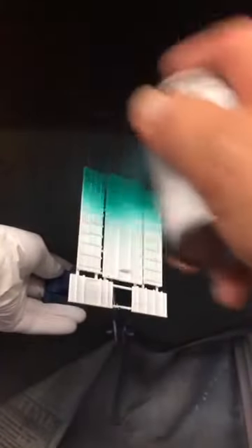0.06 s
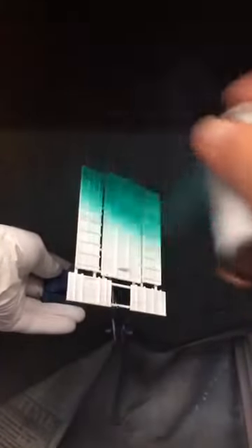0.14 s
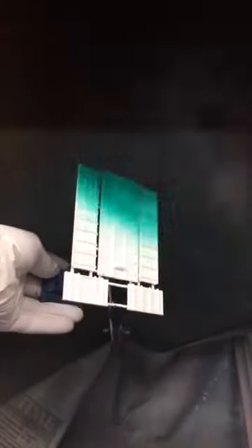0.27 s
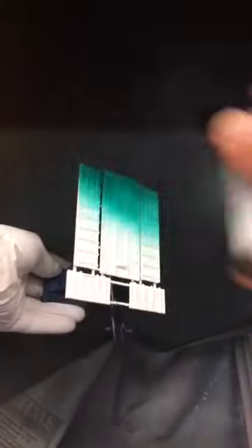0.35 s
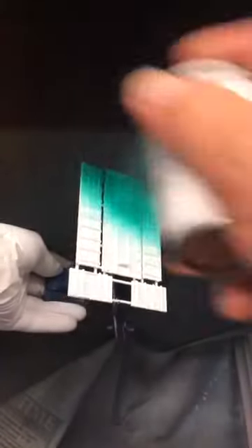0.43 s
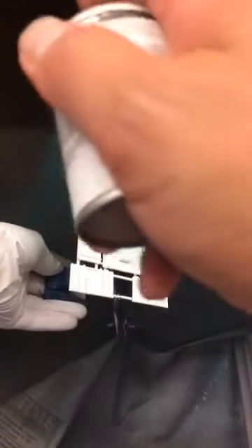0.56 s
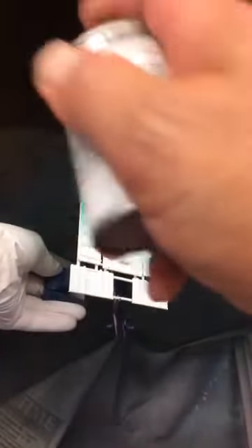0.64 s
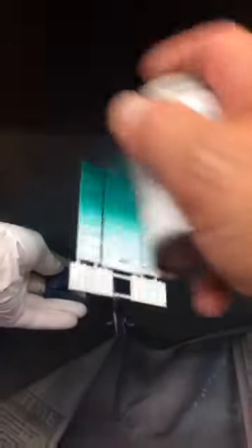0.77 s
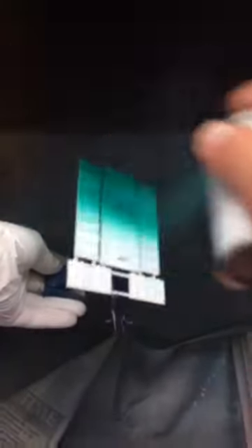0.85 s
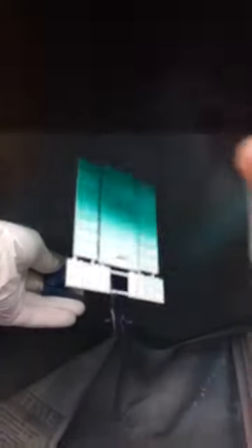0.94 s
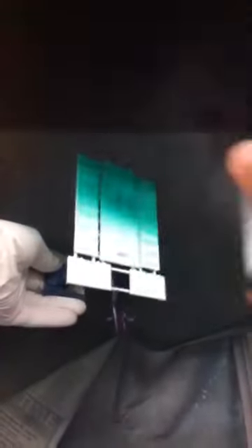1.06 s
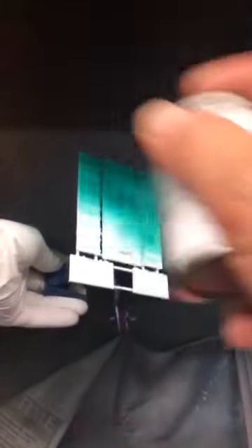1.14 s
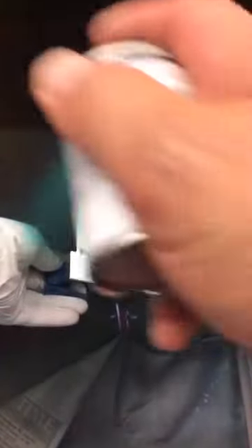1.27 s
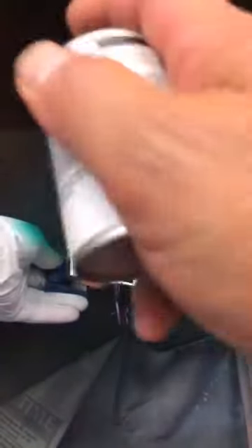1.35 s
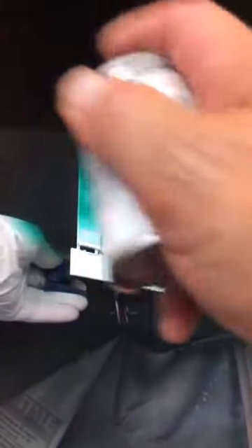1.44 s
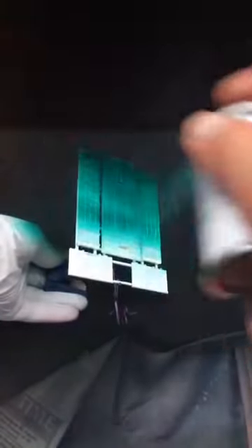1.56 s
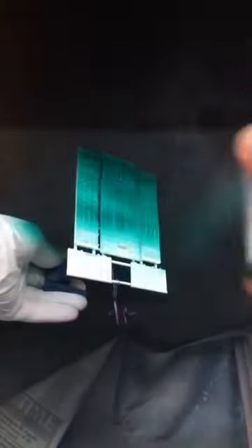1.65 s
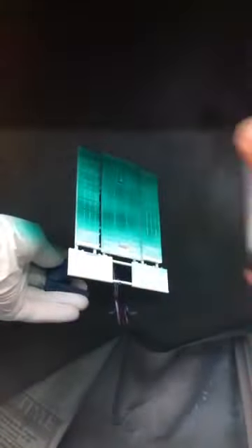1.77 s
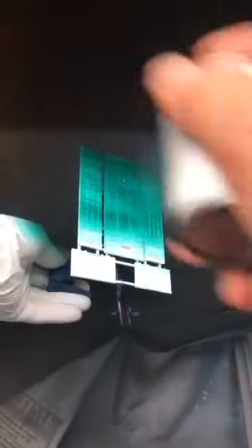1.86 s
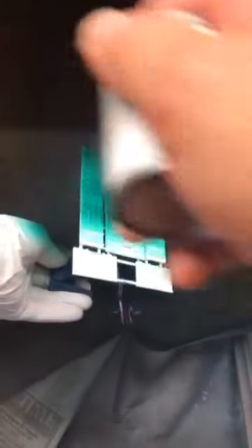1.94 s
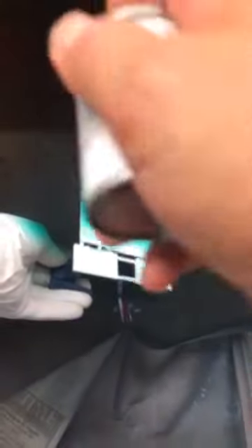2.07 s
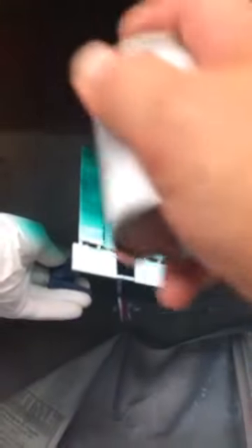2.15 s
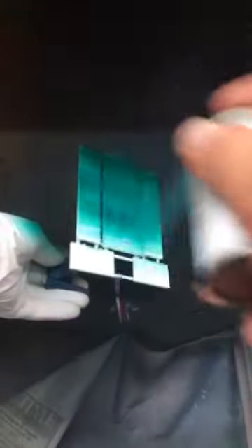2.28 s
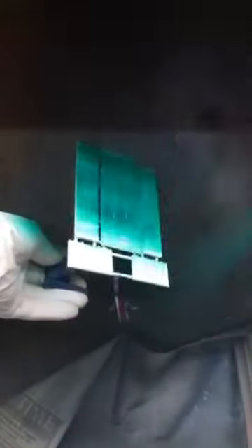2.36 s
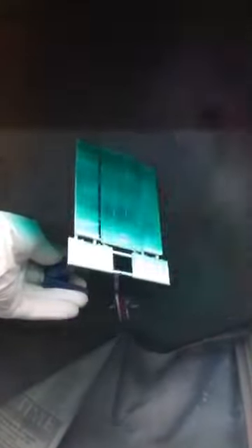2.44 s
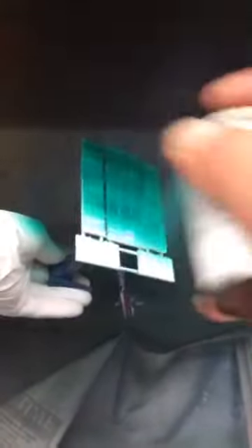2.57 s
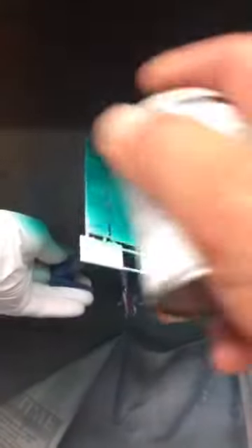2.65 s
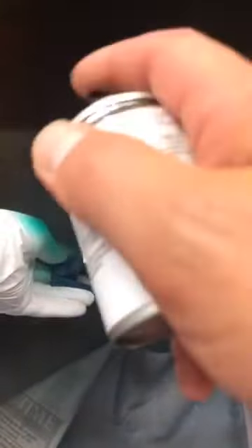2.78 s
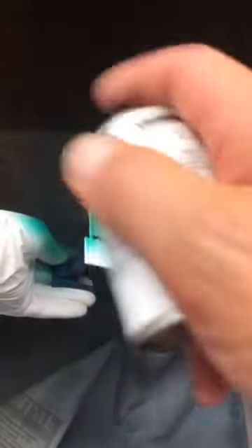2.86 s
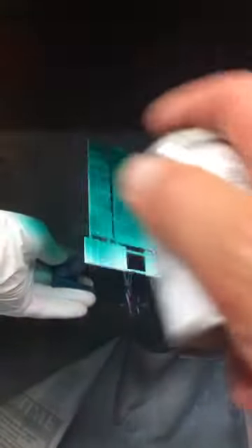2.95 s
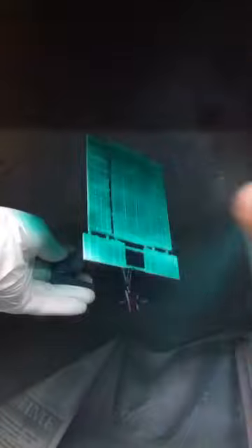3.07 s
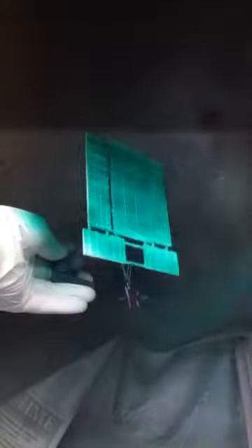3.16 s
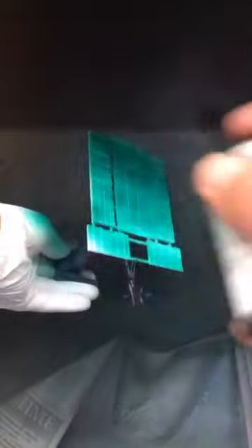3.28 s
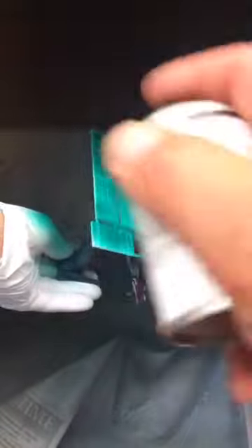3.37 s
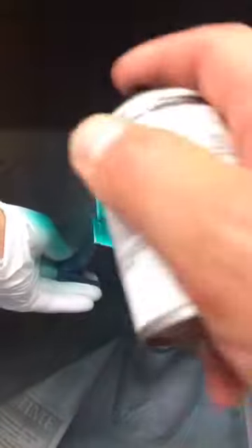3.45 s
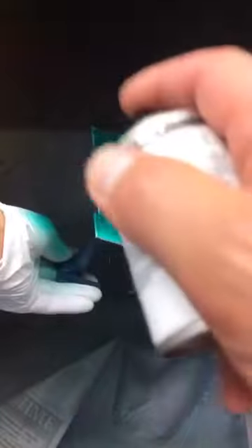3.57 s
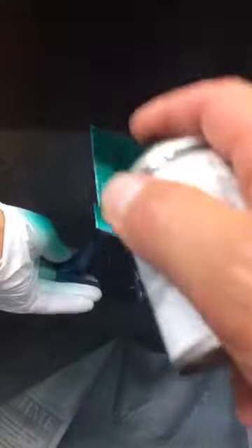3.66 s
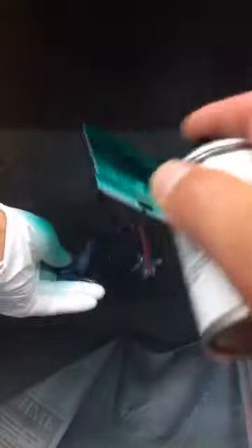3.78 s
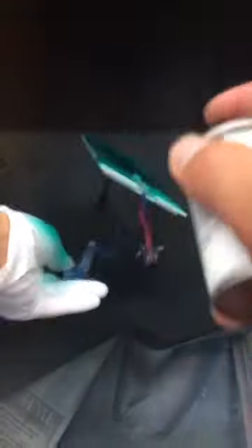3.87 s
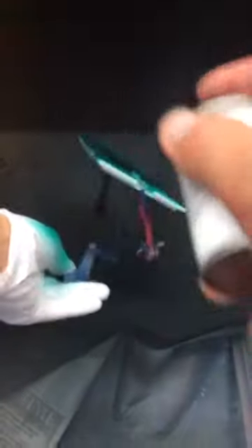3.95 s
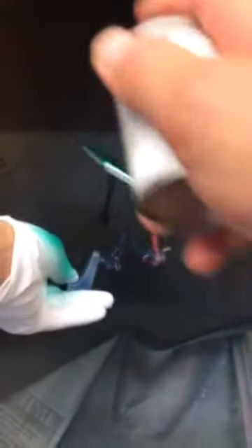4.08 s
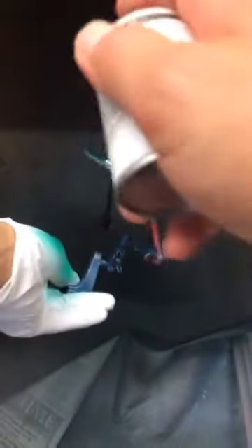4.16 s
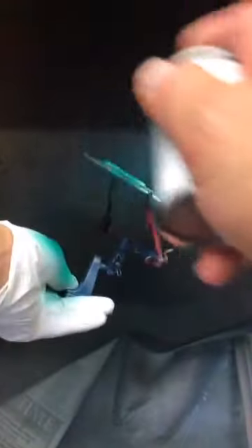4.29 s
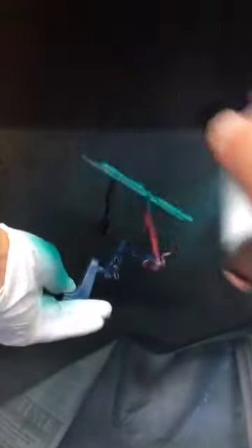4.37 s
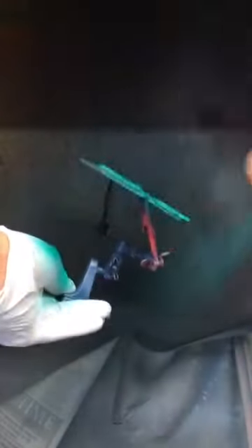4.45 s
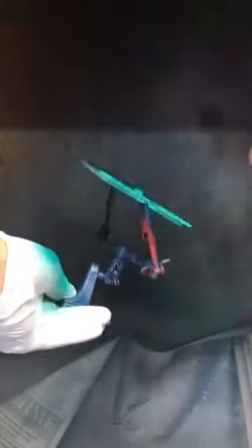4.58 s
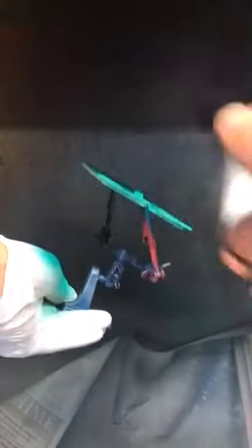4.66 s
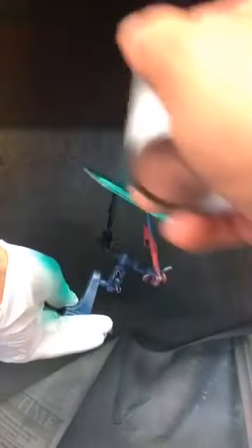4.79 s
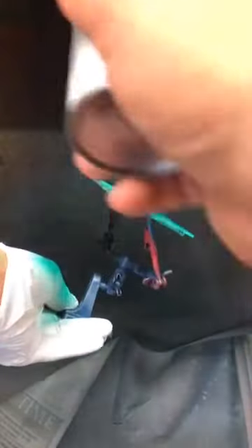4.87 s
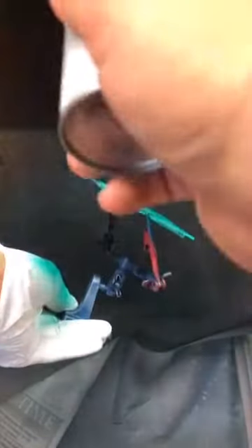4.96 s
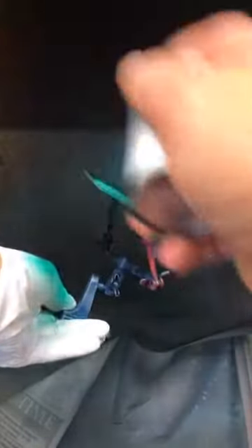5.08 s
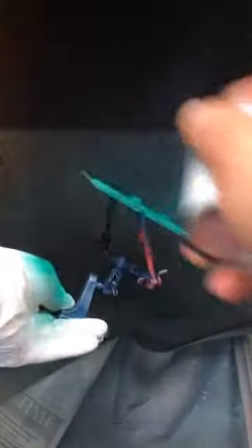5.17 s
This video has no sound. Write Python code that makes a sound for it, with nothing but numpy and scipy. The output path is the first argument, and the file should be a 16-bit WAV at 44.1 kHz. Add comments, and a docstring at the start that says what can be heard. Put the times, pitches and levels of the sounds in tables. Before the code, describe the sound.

An aerosol paint can sprays a small hand-held part in ten quick, even bursts, each a bright hiss with a soft low thump of air. In a brief pause a glove rubs faintly and the holder ticks as the part is turned. Then a few more bursts follow. The sound is close, in a small booth with a short reverberation and a quiet fan humming underneath.

```python
"""Spray can in a booth

A spray can sweeps in short bursts across a small hand-held part, heard close up. The nozzle hisses,
the jet rushes and thumps on the part, and the booth walls colour and briefly prolong it.
Underneath, a fan hums and a faint hollow ring wavers as the can is swung.
In one pause a glove rubs and the holder ticks as the part is turned."""
import sys
import numpy as np
from scipy import signal
from scipy.fft import rfft, irfft, next_fast_len
from scipy.io import wavfile
from scipy.ndimage import uniform_filter1d, map_coordinates

SR = 44100
rng = np.random.default_rng(int(sys.argv[2]) if len(sys.argv) > 2 else 0)


def to_wav(sig):
    """Store sig (one row per channel, or 1-D mono) as 16-bit WAV at the path in sys.argv[1].

    Samples outside -1..1 are clipped; the rate is SR.
    """
    pcm = np.clip(np.atleast_2d(sig), -1, 1) * 32767
    pcm = np.round(pcm).astype(np.int16)
    wavfile.write(sys.argv[1], SR, pcm.T)  # frames by channels


N = 230378
TIME = np.arange(N) / SR


def amp(db):
    """Decibels to gain."""
    return 10 ** (np.asarray(db) / 20)


def unit(x):
    """Scale to rms 1."""
    return x / np.sqrt(np.mean(x ** 2) + 1e-20)


def along(points, hz):
    """Read a curve of (frequency, value) points on a log frequency axis."""
    freqs, values = np.transpose(points)
    return np.interp(np.log(hz + 1), np.log(freqs + 1), values)


def step(t, width):
    """A smooth rise from 0 to 1 around t = 0."""
    return .5 + .5 * np.tanh(t / width)


def wobble(rate):
    """A smooth random curve with `rate` knots a second."""
    return map_coordinates(rng.standard_normal(int(N * rate / SR) + 4), [TIME * rate])


def filtered(x, response):
    """Equalise x with a gain given as a function of frequency."""
    size = next_fast_len(N + SR // 2)
    return irfft(rfft(x, size) * response(np.fft.rfftfreq(size, 1 / SR)), size)[..., :N]


def noise(spectrum, patchy_db=0):
    """Coloured noise of rms 1, optionally with drifting patches of random gain."""
    bins = signal.stft(rng.standard_normal(N), nperseg=512)[2]
    patches = uniform_filter1d(rng.standard_normal(bins.shape), size=6, axis=0)
    patches = unit(uniform_filter1d(patches, size=16, axis=1))
    white = signal.istft(bins * amp(patchy_db * patches), nperseg=512)[1][:N]
    return unit(filtered(white, lambda hz: amp(along(spectrum, hz))))


def fan(air_db=-69.5):
    """A bed of moving air with a few slightly unsteady motor tones."""
    # colour of the airflow: (frequency [Hz], relative level [dB])
    air_spectrum = [(20, -53), (40, -30), (62, -8), (90, -2.5), (135, 3.5), (200, -8), (300, 3.5),
                    (510, -7.5), (700, -5), (1400, -9.5), (2100, -14.5), (4200, -19), (9000, -19.5),
                    (15000, -25.5)]
    # motor tones: (frequency [Hz], level [dB])
    motor_tones = [(118.4, -90.5), (479.5, -83), (587, -85)]
    motor = np.zeros(N)
    for hz, db in motor_tones:
        peak = np.sqrt(2) * amp(db + 2.2 * wobble(3.94))
        motor += peak * np.sin(2 * np.pi * hz * TIME + 0.37 * wobble(4.93))
    return amp(air_db + 1.6 * wobble(2.48)) * noise(air_spectrum) + motor


def handling(rub_at_s=3.78, rub_length_s=0.14, rub_db=-76, tick_t60_s=0.028):
    """A glove rubs and the holder ticks as the part is turned."""
    # ticks of the holder: (time [s], level [dB], centre frequency [Hz])
    holder_ticks = [(3.826, -67, 8160), (3.858, -59, 1400)]
    rub = step(TIME - rub_at_s, .018) * step(rub_at_s + rub_length_s - TIME, .025)
    out = rub * amp(rub_db + 2 * wobble(60)) * noise([(300, -3), (1500, 6), (7000, 2), (15000, -2)])
    for at_s, db, hz in holder_ticks:
        age = TIME - at_s
        envelope = (age > 0) * amp(db - 60 * np.abs(age) / tick_t60_s)
        out += envelope * noise([(hz / 10, -15), (hz, 0), (hz * 10, -25)])
    return out


def hollow_ring(rise_db_per_s=190, sag_hz_per_s=120, waver_hz=9, skirt_gain=0.17):
    """A fuzzy resonance swells on the back swings, likely the can's wall as the paint shifts inside."""
    # swells of the ring: (peak time [s], pitch [Hz], level [dB], decay [dB/s], fuzz width [Hz])
    ring_swells = [(.22, 1703, -59.5, 65, 230), (.71, 1170, -68, 110, 421), (1.41, 1290, -67, 130, 381),
                   (2.02, 1568, -58.5, 65, 110.2), (2.44, 1657, -64, 62, 210),
                   (3.12, 1548, -54, 105, 109.5), (3.51, 1542, -61, 80, 99.5), (3.72, 962, -67.5, 80, 65)]
    out = np.zeros(N)
    for peak_s, hz, db, decay, fuzz_hz in ring_swells:
        age = TIME - peak_s
        envelope = amp(db - np.maximum(decay * age, -rise_db_per_s * age))
        core = wobble(fuzz_hz) + 1j * wobble(fuzz_hz)
        skirt = skirt_gain * (wobble(4 * fuzz_hz) + 1j * wobble(4 * fuzz_hz))
        pitch = hz - sag_hz_per_s * age + waver_hz * wobble(35)
        phase = 2 * np.pi * np.cumsum(pitch) / SR
        out += envelope * unit(np.real((core + skirt) * np.exp(1j * phase)))
    return out


def booth_tail(x, tails_per_s=4):
    """A short diffuse reverb, treble dying first; regularly renewed tails avoid ringing at one pitch."""
    # decay of the booth: (frequency [Hz], time to fall 60 dB [s])
    decay_times = [(200, 0.87), (1500, 0.72), (6000, 0.33), (15000, 0.29)]
    out = np.zeros(N)
    segment = np.floor(TIME * tails_per_s)
    for k in np.unique(segment):
        hz, age, bins = signal.stft(rng.standard_normal(SR // 2), SR, nperseg=256)
        decay = amp(-60 * age / along(decay_times, hz)[:, None])
        tail = signal.istft(bins * decay, SR, nperseg=256)[1]
        out += signal.fftconvolve(x * (segment == k), tail / np.linalg.norm(tail))[:N]
    return out


def near_walls(x, swing=0.0992):
    """The direct sound plus early echoes, whose paths shift with the swinging can and comb the hiss."""
    # echoes off nearby surfaces: (delay [s], gain [linear])
    wall_echoes = [(.00133, 0.086), (.0021, 0.1), (.0042, 0.17), (.0075, 0.19)]
    echoes = np.zeros(N)
    for delay_s, gain in wall_echoes:
        moving_delay = delay_s * (1 + swing * wobble(4))
        echoes += gain * map_coordinates(x, [(TIME - moving_delay) * SR], order=3)
    return x + echoes


def edge_tones(half_width_s=0.021, fuzz_hz=380):
    """Narrow bands of turbulence sing briefly as the jet crosses the part's edges."""
    # edge crossings: (time [s], pitch [Hz], level [dB])
    crossings = [(1.9, 4910, -49), (3.43, 5100, -47.5), (4.23, 1400, -54), (4.25, 5010, -54),
                 (4.45, 1763, -54), (4.495, 4930, -52)]
    out = np.zeros(N)
    for at_s, hz, db in crossings:
        eddies = wobble(fuzz_hz) + 1j * wobble(fuzz_hz)
        whistle = unit(np.real(eddies * np.exp(2j * np.pi * hz * TIME)))
        out += amp(db) * np.exp(-((TIME - at_s) / half_width_s) ** 2) * whistle
    return out


def spray(open_s=0.0069, close_s=0.011, leak=0.15, hiss_rise_db=0.5, off_part=0.24, drops_per_s=120):
    """Each press leaks, then opens the valve; the jet thumps on the part and softens as it sweeps on."""
    # valve presses: (opens [s], closes [s], leak lead [s], relative hiss [dB], relative rush [dB],
    # rush fade over the sweep [dB], relative thump [dB], time on the part [s])
    presses = [(0.017, 0.232, 0.0018, -38, -41.5, 5, -58.5, 0.11),
               (0.382, 0.602, 0.016, -38, -41.5, 0.5, -63, 0.31),
               (0.766, 0.987, 0.019, -39, -42.5, 2, -60.5, 0.12),
               (1.107, 1.34, 0.011, -38, -41.5, 0, -60, 0.42),
               (1.493, 1.714, 0.018, -38.5, -42.5, 4, -60, 0.14),
               (1.847, 2.02, 0.027, -38.5, -41.5, 4, -59.5, 0.3),
               (2.218, 2.417, 0.014, -39, -42, 5, -57, .10),
               (2.550, 2.746, 0.025, -38, -40.5, 0, -60.5, 0.19),
               (2.929, 3.157, 0.022, -38, -41.5, 5.5, -61.5, 0.14),
               (3.296, 3.459, 0.03, -38, -40, 0.5, -58.5, 0.23),
               (4.196, 4.527, 0.026, -38, -42.5, 2.5, -54, 0.053),
               (4.685, 4.889, 0.0065, -39, -43, 1, -63, .16), (5.077, 5.3, 0.018, -38, -44, 6, -60, 0.097)]
    # bright hiss of the nozzle: (frequency [Hz], relative level [dB])
    hiss_spectrum = [(5000, -39), (8500, -5), (10100, -5.5), (11500, -2), (12400, -2.3), (13100, 2.5),
                     (14000, 0), (15200, 0)]
    # broad rush of the jet: (frequency [Hz], relative level [dB])
    rush_spectrum = [(250, -34), (400, -13.5), (510, -17), (690, -7.5), (1100, -11.5), (1500, -5.5),
                     (1950, -5), (2700, -7), (3800, -3), (4300, -5.5), (5000, -1.3), (7000, 0),
                     (8800, -1.1), (9800, -5), (13000, -13.5)]
    # low thump of the jet on the part: (frequency [Hz], relative level [dB])
    thump_spectrum = [(50, -40), (110, -23), (155, 1.5), (215, 1), (290, -2.5), (390, -3), (500, -22),
                      (700, -4.5), (880, -16.5), (1500, -14.5), (3000, -39)]
    hiss_gain, rush_gain, thump_gain = np.zeros((3, N))
    for opens, closes, lead, hiss_db, rush_db, fade_db, thump_db, on_part in presses:
        seep = np.clip((TIME - opens + lead + 0.0062) / (lead + 0.005), 0, 1)
        opening = leak * seep + (1 - leak) * step(TIME - opens, open_s)
        valve = opening * step(closes - TIME, close_s)
        sweep = np.clip((TIME - opens) / (closes - opens), 0, 1) - .5
        aim = off_part + (1 - off_part) * step(opens + on_part - TIME, 0.024)
        hiss_gain += valve * amp(hiss_db + hiss_rise_db * sweep)
        rush_gain += valve * amp(rush_db - fade_db * sweep)
        thump_gain += valve * aim * amp(thump_db)
    sputter = amp(0.5 * wobble(60) + 0.83 * wobble(400))  # paint and gas leave the nozzle unevenly
    drops = (rng.random(N) < drops_per_s / SR) * rng.standard_normal(N)
    spits = amp(7) * filtered(drops, lambda hz: amp(along(rush_spectrum, hz)))  # larger drops spit
    hiss = amp(0.5) * hiss_gain * noise(hiss_spectrum, patchy_db=2.0)
    rush = amp(-0.23) * rush_gain * (noise(rush_spectrum, patchy_db=2.0) + spits)
    thump = amp(3.0) * thump_gain * noise(thump_spectrum)
    return sputter * (hiss + rush) + thump


def scene(reverb_db=-16.5):
    """The spray and its reflections up front, over the ring, handling and fan, in centred mono."""
    jet = near_walls(spray() + edge_tones())
    mono = jet + amp(reverb_db) * booth_tail(jet) + hollow_ring() + handling() + fan()
    return np.array([mono, mono])


def record(dry, cutoff_hz=15430):
    """A steep low-pass takes off the very top of the treble."""
    return filtered(dry, lambda hz: step(cutoff_hz - hz, 70))


dry = scene()
out = record(dry)
to_wav(out)
```